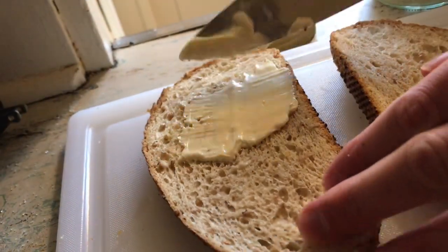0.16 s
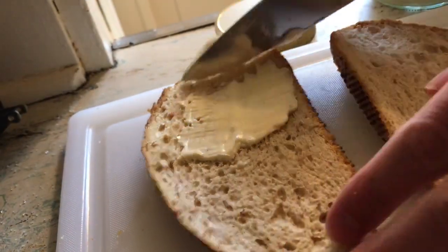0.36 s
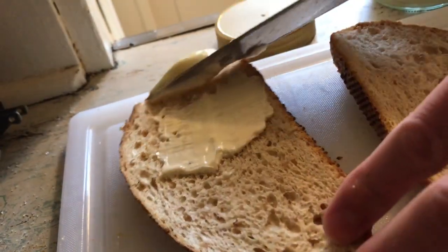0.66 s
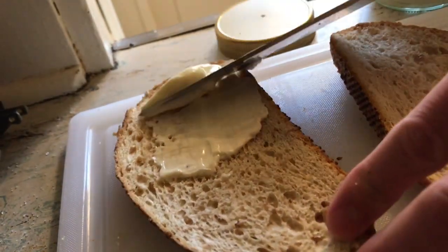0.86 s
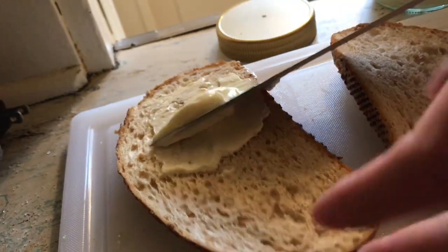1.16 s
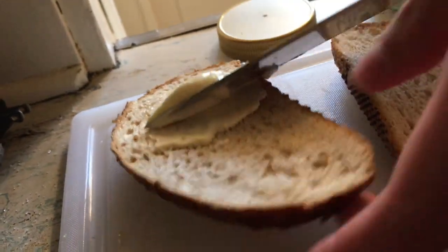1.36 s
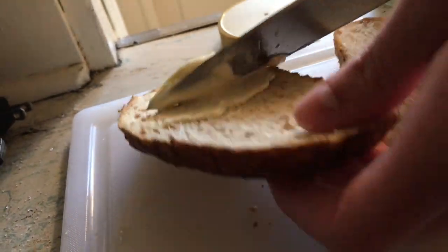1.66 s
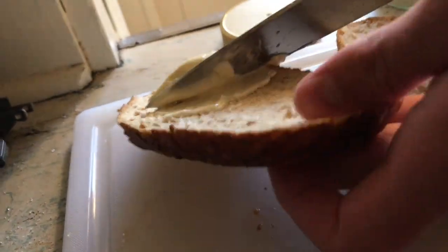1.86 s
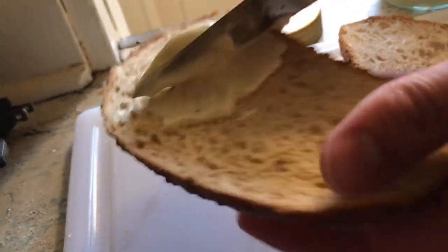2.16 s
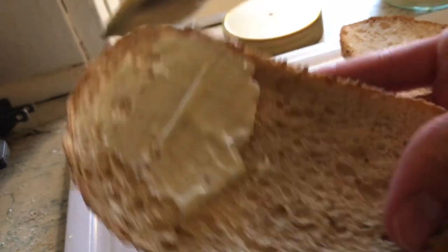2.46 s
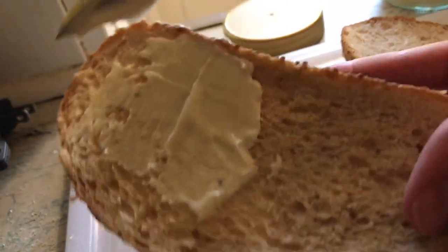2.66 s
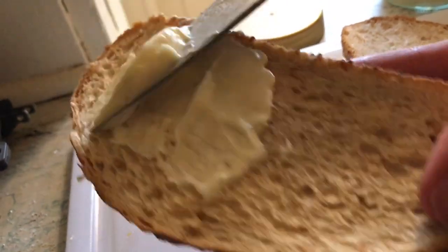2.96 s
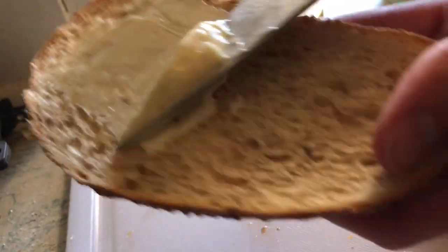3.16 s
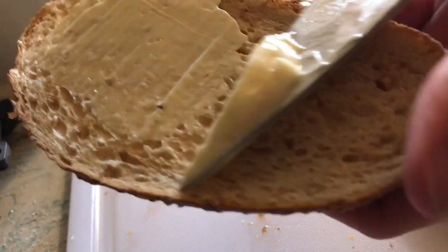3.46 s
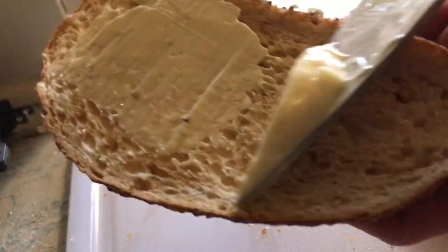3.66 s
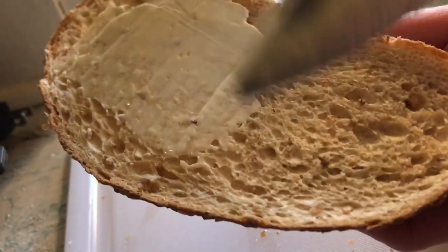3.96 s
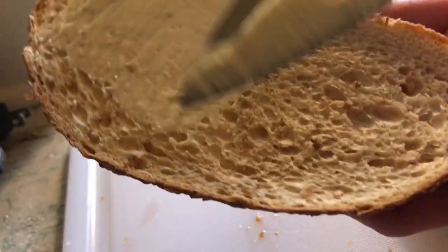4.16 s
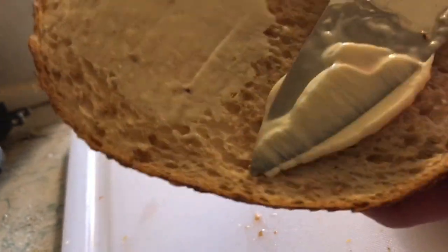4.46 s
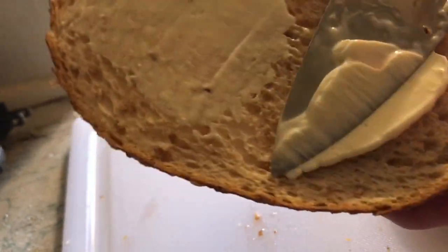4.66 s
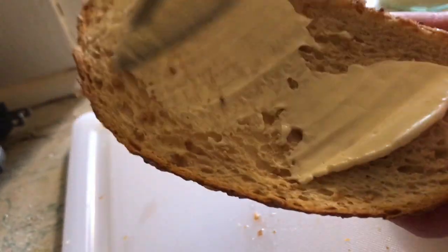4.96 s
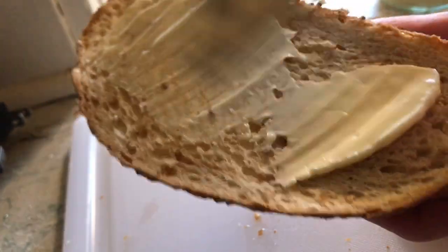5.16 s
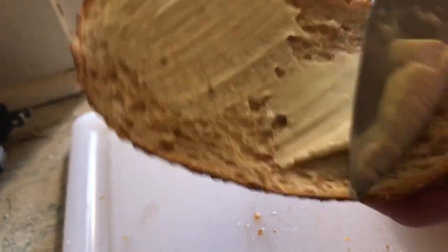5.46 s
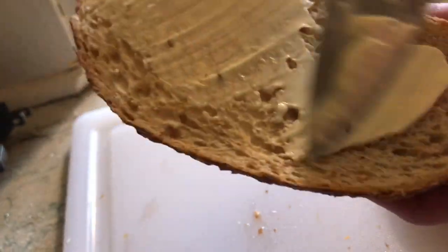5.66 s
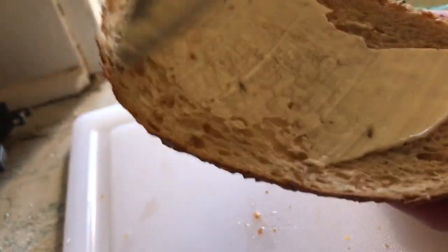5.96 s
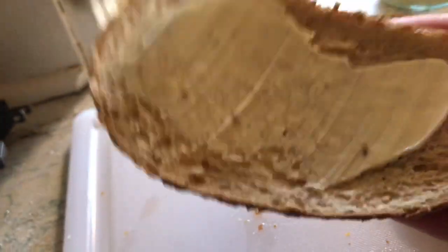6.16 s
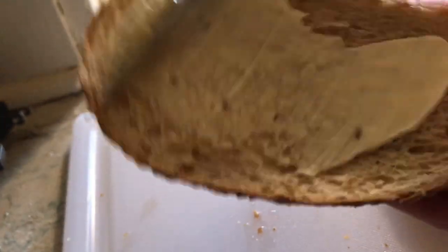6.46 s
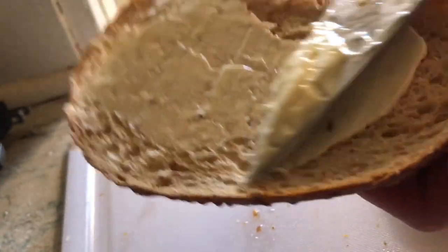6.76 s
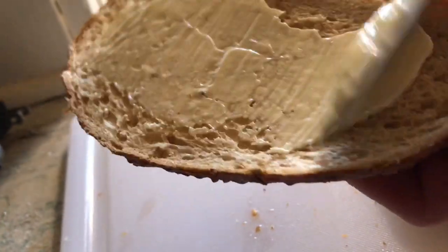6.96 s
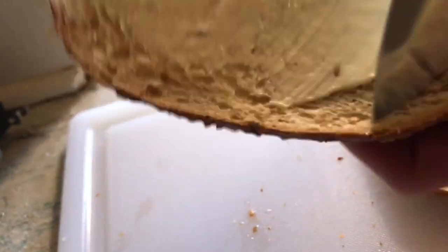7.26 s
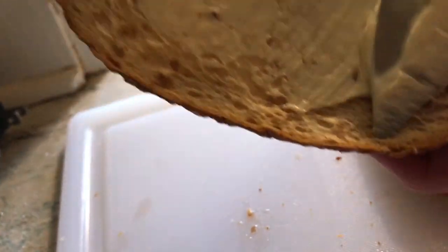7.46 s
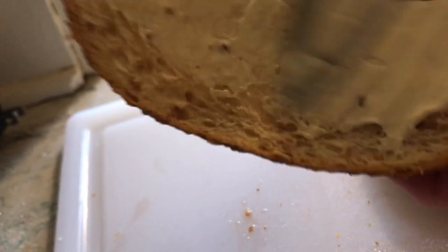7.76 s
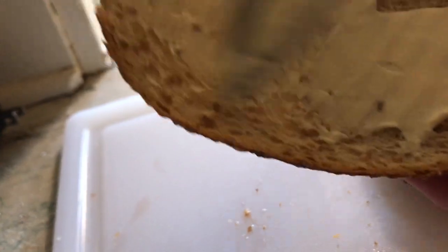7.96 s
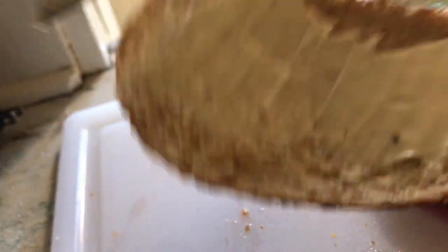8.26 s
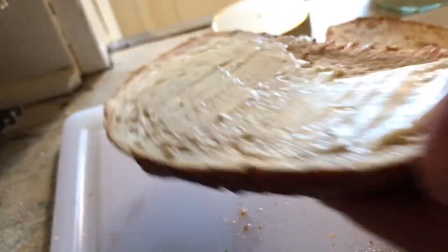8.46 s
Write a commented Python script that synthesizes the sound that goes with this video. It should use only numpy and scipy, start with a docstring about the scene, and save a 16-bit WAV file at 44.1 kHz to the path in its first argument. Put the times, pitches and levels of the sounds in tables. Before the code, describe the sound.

Very close to the microphone, a table knife scrapes butter over crisp toast. The strokes are short, dry and uneven, full of tiny crackles and sharper crust snaps. At first the slice also rubs and bumps softly on its board; after a pause the scraping grows brisker and brighter, with thin metallic rings as the blade slips off. A small, hard-walled kitchen adds a short tail over faint still air.

```python
"""A table knife spreads butter over a slice of toast, close to the microphone in a small quiet kitchen.
Each stroke crushes a swarm of tiny crust cells and snaps a few large ones; slice and crust colour the noise bursts.
The crackle shakes the damped blade, which rings more freely as it slips off the crust.
Beneath are soft thuds, the slice rubbing on its board in the first seconds, a short hard-walled room and still air."""
import sys
import numpy as np
from scipy import signal
from scipy.fft import rfft, irfft
from scipy.io import wavfile
from scipy.ndimage import uniform_filter1d

SR = 44100
rng = np.random.default_rng(int(sys.argv[2]) if len(sys.argv) > 2 else 0)


def persist_wave(psi):
    """Save psi, clipped to +-1, as 16-bit WAV."""
    counts = np.round(np.clip(psi, -1, 1) * 32767).astype(np.int16)
    wavfile.write(sys.argv[1], SR, np.atleast_2d(counts).T)


N = 379701


def amp(db):
    """Decibels to gain."""
    return 10 ** (np.asarray(db) / 20)


def unit(x):
    """Scales to rms 1."""
    return x / np.sqrt(np.mean(x ** 2) + 1e-20)


def read(points, hz):
    """Reads a table on a log-frequency axis."""
    f, value = np.transpose(points)
    return np.interp(np.log(hz + 1), np.log(f), value)


def add(mix, s, sound):
    """Mixes a sound in at time s."""
    part = mix[..., max(round(s * SR), 0):][..., :sound.shape[-1]]
    part += sound[..., :part.shape[-1]]


def noise(spectrum):
    """Steady noise of rms 1 with a given spectrum."""
    gain = amp(read(spectrum, np.fft.rfftfreq(N, 1 / SR)))
    return unit(irfft(rfft(rng.standard_normal(N)) * gain, N))


def drift(corner_hz):
    """A smooth random curve of rms 1, with little above the corner frequency."""
    hz = np.fft.rfftfreq(N, 1 / SR)
    return unit(irfft(rfft(rng.standard_normal(N)) / (1 + (hz / corner_hz) ** 4), N))


def causal(gain):
    """The sharpest (minimum-phase) impulse response that has this gain curve."""
    log_gain = np.log(np.maximum(np.r_[gain, gain[-2:0:-1]], 1e-5))
    return np.fft.ifft(np.exp(np.conj(signal.hilbert(log_gain)))).real[:len(gain)]


# still air of the kitchen: (frequency [Hz], relative density [dB per Hz])
AIR = [(20, -5), (45, -1.5), (65, 7), (130, -2.5), (250, -4.5), (500, -9.5), (1000, -14), (2000, -17.5),
       (4500, -19.5), (8000, -23), (10500, -22.5), (14000, -21), (15600, -28)]


def air(level_db=-66.5):
    """Steady coloured noise stands for the quiet kitchen behind everything."""
    return amp(level_db) * noise(AIR)


# how long the kitchen rings: (frequency [Hz], time to fall 60 dB [s])
KITCHEN_T60 = [(150, 0.35), (600, 0.35), (1500, 0.3653), (4000, 0.49), (8000, 0.37), (15000, 0.25)]
# colour of the kitchen's tail: (frequency [Hz], relative level [dB])
KITCHEN_COLOUR = [(100, 11), (700, 4.5), (3000, -0.5), (7000, -2.5), (15000, 4)]


def kitchen(x, early_db=-17, tail_db=-15):
    """Board and worktop reflect within 20 ms; then a short tail comes from the hard walls."""
    early = np.zeros(SR // 50)
    at = rng.integers(SR // 500, len(early), size=10)
    early[at] = rng.choice([-1, 1], size=10) / np.sqrt(10)
    # sparse random echoes; each band of frequencies then dies away at its own pace
    taps = rng.standard_normal(SR) * (rng.random(SR) < .1) * (np.arange(SR) > SR // 150)
    hz, t, z = signal.stft(taps, SR, nperseg=256)
    decay_db = 60 * t / read(KITCHEN_T60, hz)[:, None]
    z = z * amp(read(KITCHEN_COLOUR, hz)[:, None] - decay_db)
    tail = signal.istft(z, SR, nperseg=256)[1]
    tail /= np.linalg.norm(tail)
    reflections = amp(early_db) * signal.oaconvolve(x, early)[:N]
    return reflections + amp(tail_db) * signal.oaconvolve(x, tail)[:N]


def push(rise_s, length_s, sag_db, bite_s=0.0025, bite_db=-15, let_go_s=0.005):
    """The gain of one push of the hand: it bites in low, builds up, sags and lets go quickly."""
    t = np.arange(SR) / SR
    sag = np.clip((t - rise_s) / max(length_s - rise_s, bite_s), 0, 1)
    db = bite_db * np.maximum(1 - t / rise_s, 0) - sag_db * sag
    let_go = np.exp(-np.maximum(t - length_s, 0) / let_go_s)
    return amp(db) * (1 - np.exp(-t / bite_s)) * let_go


# rumble of the board: (frequency [Hz], relative density [dB per Hz])
BOARD = [(20, -26.5), (55, -4), (100, -0.5), (170, -0.5), (300, -15), (700, -19), (2000, -54)]
# the slice is shoved over the board:
# (time [s], rise [s], length [s], level before bite, sag and jerks [dB], sag by the end [dB])
SHOVES = [(0.0, 0.037, 0.11, -53.5, -5.5), (0.385, 0.031, 0.52, -61, -6.5), (0.954, 0.073, .2, -42, 7),
          (1.473, 0.14, 0.78, -58.5, 14.5)]


def shuffle(lumpy_db=4):
    """The slice rubs on the board in small jerks: board rumble under an uneven force."""
    force = np.zeros(N)
    for s, rise_s, length_s, db, sag_db in SHOVES:
        add(force, s, amp(db) * push(rise_s, length_s, sag_db))
    return noise(BOARD) * force * amp(lumpy_db * drift(30))


# soft blows of knife and fingers on the slice: (time [s], level of the swing [dB], pitch [Hz])
THUDS = [(0.386, -33.5, 91), (1.015, -34, 140.9), (1.06, -37.5, 150), (1.565, -49, 133), (1.66, -47, 293),
         (1.70, -39, 87.7), (2.846, -47, 65.9), (3.647, -46, 194.7), (5.411, -47.5, 76.4),
         (6.473, -38, 65.7), (7.279, -44.5, 109), (8.03, -36.5, 92.8)]


def thuds(rise_s=0.00069, fade_s=0.019, puff=0.43):
    """The soft slice takes a blow and swings, quickly damped, with a dull puff."""
    out, t, rumble = np.zeros(N), np.arange(SR // 5) / SR, noise(BOARD)
    shape = (1 - np.exp(-t / rise_s)) * np.exp(-t / fade_s)
    shape /= shape.max()
    for k, (s, db, hz) in enumerate(THUDS):
        swing = np.sin(2 * np.pi * hz * t) + puff * rumble[k * len(t):][:len(t)]
        add(out, s, amp(db) * swing * shape)
    return out


# modes of the free blade: (frequency [Hz], relative level [dB], time to fall 60 dB [s])
FREE_BLADE = [(2160, -6.5, 0.36), (2736, -14, 0.22), (3620, 1, 0.14), (4600, -13, .28), (5020, -6, 0.36),
              (5070, -10, 0.29), (6000, 0, .23), (7150, -2.5, 0.24), (14400, -10, .18)]
# the blade slips off the crust and rings freely:
# (time [s], level added to the modes [dB], pitch favoured among the modes [Hz])
RELEASES = [(0.085, -70, 5900), (3.483, -47.5, 4960), (3.815, -42, 4900), (4.894, -41, 5100),
            (6.053, -39.5, 6900), (7.011, -34, 3650), (8.063, -25, 6300), (8.11, -35, 3600),
            (8.146, -39.5, 6800)]


def free_blade(crackle, fed_db=-18, focus_db_per_octave=30, twin_hz=24, twin_db=-5):
    """The part of the blade clear of the bread rings on: fed by the crackle, and struck at each release."""
    t, modes = np.arange(SR // 2) / SR, []
    for hz, db, t60 in FREE_BLADE:
        # the blade is a little lopsided, so every mode has a weaker twin that beats against it
        twin = amp(twin_db) * np.sin(2 * np.pi * (hz + twin_hz) * t)
        modes.append(amp(db - 60 * t / t60) * (np.sin(2 * np.pi * hz * t) + twin))
    modes = np.array(modes)
    ring = modes.sum(0)
    out = amp(fed_db) * signal.oaconvolve(crackle, ring / np.linalg.norm(ring))[:N]
    for s, db, hz in RELEASES:
        octaves = abs(np.log2(np.transpose(FREE_BLADE)[0] / hz))
        add(out, s, amp(db - focus_db_per_octave * np.minimum(octaves, .5)) @ modes)
    return out


# blade resonances, damped by butter and bread: (frequency [Hz], width [Hz], relative level [dB])
PRESSED_BLADE = [(2797, 110, 5), (3670, 120, 4), (5220, 77, 11), (5980, 190, 8), (6954, 260, 4),
                 (7600, 100, -3.5), (8380, 91, 3.5), (9130, 290, 7), (12480, 250, -0.5), (13200, 220, -7),
                 (14440, 320, 8.5)]


def pressed_blade(crackle, node_db=3.0, wander_db=4.0, bend=0.0049, level_db=-3):
    """The crackle shakes damped modes; their strength varies with the contact point, their pitch drifts."""
    out, (s, *_, cm) = np.zeros(N), np.transpose(STROKES)
    contact_cm = cm[np.maximum(np.searchsorted(s, np.arange(N) / SR) - 1, 0)]
    for hz, width, db in PRESSED_BLADE:
        # bending waves in thin steel shorten with the root of the frequency
        wavelength_cm = 302 / np.sqrt(hz)
        coupling_db = node_db * np.cos(4 * np.pi * contact_cm / wavelength_cm) + wander_db * drift(7.0)
        fed = crackle * amp(level_db + db + coupling_db)
        # shift the drifting mode down to 0 Hz, smooth it to the mode's width, and shift it back
        turn = np.exp(2j * np.pi * np.cumsum(hz * (1 + bend * drift(4.0))) / SR)
        r = np.exp(-np.pi * width / SR)
        out += 2 * (turn * signal.lfilter([1 - r], [1, -r], fed / turn)).real
    return out


EDGE_HZ = 15800  # the recorder's upper band limit
# spectrum of one crumb breaking: (frequency [Hz], relative density [dB per Hz])
CRUMB = [(25, -43.5), (55, -7), (140, -8.5), (330, -8), (600, -7.5), (1200, -3), (2200, -6.5), (3000, -3),
         (5000, -4.5), (7000, -3.5), (10300, -7.5), (12500, 0.5), (14300, -4.5), (15600, -7.5)]


def toast(parts, bass_hz=600, hollow_hz=1550, crisp_hz=8000, bass_share=0.27, level_db=-3.0):
    """The slice radiates a hollow band of each break, the dry crust the middle and top."""
    hz = np.fft.rfftfreq(4096, 1 / SR)
    low = 1 / (1 + (hz / hollow_hz) ** 4)
    high = 1 / (1 + (crisp_hz / (hz + 1)) ** 6)
    low = low * (1 - (1 - bass_share) / (1 + (hz / bass_hz) ** 4))
    colour = amp(read(CRUMB, hz))
    colour /= np.sqrt(np.mean(colour ** 2 * (hz < EDGE_HZ)))
    bins, breaks = np.fft.rfftfreq(N, 1 / SR), np.zeros(N)
    for part, share in zip(parts, (low, 1 - low - high, high)):
        breaks += irfft(rfft(part) * np.interp(bins, hz, share), N)
    return amp(level_db) * signal.oaconvolve(breaks, causal(colour))[:N]


def loose_crumbs(per_s=15, level_db=-59, hollow_db=3, crisp_db=-7, until_s=2.2):
    """Crumbs tick faintly under the slice while the fingers move it about; rows like CRACKS."""
    at = np.flatnonzero((rng.random(N) < per_s / SR) & (np.arange(N) < until_s * SR))
    sizes = rng.standard_normal(N)[at]
    return [(i / SR, level_db + 2 * size, hollow_db, crisp_db) for i, size in zip(at, sizes)]


def small_cracks(force, per_s=42, over_db=-2, least_db=-45, spread_db=4,
                 hollow_db=-6, crisp_db=1, colour_db=6):
    """Lesser snaps come by chance under a firm blade, their level following its push; rows like CRACKS."""
    at = np.flatnonzero((rng.random(N) < per_s / SR) & (force > amp(least_db)))
    size, hollow, crisp = rng.uniform(-0.87, 1, (N, 3))[at].T
    db = 20 * np.log10(force[at]) + over_db + spread_db * size
    return list(zip(at / SR, db, hollow_db + colour_db * hollow, crisp_db + colour_db * crisp))


# the snaps of crust that stand out:
# (time [s], relative level [dB], hollowness = how much the slice sounds [dB], crispness = extra top [dB])
CRACKS = [(0.044, -28, 3, -4), (0.385, -23, -4.5, -10), (0.432, -26, -14, -14), (0.661, -43, -1.5, 1.5),
          (0.682, -37, 8.5, -1.5), (0.704, -35.5, -3, -1.5), (0.76, -31, 2, 0.5), (0.777, -30, -3, -3),
          (0.822, -22.5, 5, -14), (0.983, -22.5, -2, -1.5), (1.139, -29.5, -2, -4), (1.164, -31.5, 0, -2),
          (1.394, -27.5, -4.5, -3), (1.422, -30, 2, -8), (1.528, -39, 7, -7), (1.565, -33, 1, -8),
          (1.63, -33, -17, -3.5), (1.666, -41, 11, -4), (1.705, -34.5, 5.5, -8.5), (1.8, -41.5, 2, -7),
          (1.828, -43, 9, -14), (1.919, -41, -9, -0.5), (1.953, -34, -20, -2), (2.072, -38, 3, -5.5),
          (2.844, -41, 7.5, -12.5), (2.932, -30, -26, -1), (2.972, -34, 2.5, -7.5), (3.023, -27, -7, -4.5),
          (3.084, -28.5, -6, 7.5), (3.273, -31, 9, 8.5), (3.281, -26, -10.5, 4.5),
          (3.334, -33.5, -10.5, 4.5), (3.446, -21, -21.5, 3.5), (4.357, -42.5, 2, -5),
          (4.402, -39.5, -11.5, -7), (4.475, -32.5, 0, -8), (4.53, -44, -0.5, -4), (4.546, -44, 8.5, -2.5),
          (4.752, -24.5, 3, 3.5), (4.778, -20, 5, 0.5), (4.795, -21.5, -6, 0), (4.894, -25.5, 4.5, 1),
          (4.966, -32.5, -7.5, -9), (5.41, -26, -1, -3), (5.59, -20, -11, 1), (5.68, -19, -7, 1.5),
          (5.875, -29, 14, 1.5), (5.991, -26.5, 11, 4.5), (6.473, -24.5, 4.5, 6), (6.49, -27.5, -1, -3),
          (6.673, -24, -8, 6), (6.707, -17, -12, -3.5), (6.769, -34, -12, 1), (6.826, -20.5, -6.5, -9),
          (6.881, -21.5, -6, -5.5), (6.91, -29, 6, -1), (6.942, -28.5, -6, -3.5), (7.012, -28.5, -13, 2),
          (7.278, -33, 13, -6.5), (7.33, -32.5, -6, -7), (7.337, -37, 7, 10), (7.353, -32.5, 4, -21),
          (7.418, -27, -1, -8.5), (7.485, -25, -7, -14), (7.505, -22.5, -25, -2.5), (7.626, -44, -9, 5.5),
          (7.745, -19, -17, -3), (7.827, -25, -10, 6), (8.016, -21, 5, 5), (8.063, -18.5, -17, -1.5),
          (8.089, -16.5, -9, 0.5), (8.279, -50, -8, 5.5), (8.372, -52.5, -2, -5), (8.581, -48.5, -5, -12)]


def cracks(rows, rise_s=0.00047, fade_s=0.0027, onset_s=.0014, onset_db=-20, splinter_db=4.5,
           level_db=0, knock_hz=3600, knock_q=2.5, knock_per_db=0.07):
    """A large cell snaps in a quick run of splinters, with a softened onset; hollow, middle, crisp parts."""
    out, t = np.zeros((3, N)), np.arange(-SR // 125, SR // 50) / SR
    after = np.maximum(t, 0)
    snap = (1 - np.exp(-after / rise_s)) * np.exp(-after / fade_s)
    shape = snap + amp(onset_db) * np.exp(-abs(t) / onset_s)
    knock = signal.iirpeak(knock_hz, knock_q, fs=SR)
    draws = rng.standard_normal(size=(400, 2, len(t)))
    for (s, db, hollow_db, crisp_db), (run, hiss) in zip(rows, draws):
        splinters = unit(uniform_filter1d(run, size=20))
        burst = hiss * amp(splinter_db * splinters) * shape
        # the duller the snap, the thicker the piece of crust, and the more it knocks with a pitch
        burst = burst + knock_per_db * max(-crisp_db, 0) * signal.lfilter(*knock, burst)
        # same energy as 4 ms of noise at rms 1
        burst *= np.sqrt(.004 * SR / np.sum(burst ** 2))
        add(out, s + t[0], amp(level_db + db + np.array([[hollow_db], [0], [crisp_db]])) * burst)
    return out


def crumb_colour(ripple_db, lowest_hz=1800, order=4):
    """Size and shape give a crumb its own few resonances, weaker in the bass; energy 1."""
    hz = np.fft.rfftfreq(256, 1 / SR)
    bumps = unit(signal.convolve(rng.standard_normal(len(hz)), np.hanning(order + 2), "same"))
    response = causal(amp(ripple_db * bumps * np.minimum(hz / lowest_hz, 1)))
    return response / np.linalg.norm(response)


def scrape(drive, cells_per_s=520, spread_db=2.0, fade_s=0.0014, smear=0.055, level_db=-1.5,
           flicker_db=2.36, catches_per_s=110, ripple_db=3.5, judder_db=2, judders_per_s=70, count=12):
    """Crust cells give way under the edge, each a tiny puff; returns hollow, middle and crisp parts."""
    sizes = amp(spread_db * np.minimum(rng.exponential(1, N), 4)) ** 2
    cells = sizes * (rng.random(N) < cells_per_s / SR)
    power = signal.lfilter([1], [1, -np.exp(-1 / (fade_s * SR))], cells)
    # the hand sets the work done; chance only shares it out among the cells, and butter smears a little
    power = power / (uniform_filter1d(power, size=700) + 1e-6) + smear
    puffs = np.sqrt(np.abs(power)) * rng.standard_normal(N)
    # the edge catches one crumb after another; each lends one of a few colours for a moment
    catch = np.cumsum(rng.random(N) < catches_per_s / SR)
    crumb = rng.permutation(N)[catch] % count
    puffs = sum(signal.oaconvolve(puffs * (crumb == k), crumb_colour(ripple_db))[:N] for k in range(count))
    # the blade judders over the ridges and holes of the crust
    puffs = puffs * amp(level_db + judder_db * drift(judders_per_s))
    # the balance of the three parts flickers too
    return np.array([puffs * part * amp(flicker_db * drift(70)) for part in drive])


# strokes of the blade: (time [s], rise [s], length [s], drive before bite and sag [dB], sag by the end [dB],
# hollowness at the start [dB], hollowness at the end [dB], crispness [dB], contact from the handle [cm])
STROKES = [(0.0, 0.004, .06, -41.5, 0.5, 21, 7.5, -3, 13),
           (0.064, 0.0095, 0.029, -31, 6.5, 10.5, 4, -10, 13),
           (0.786, 0.007, 0.076, -26, 6, -4, 2.5, -6.5, 13),
           (0.962, 0.034, .156, -26.5, 3, 3.5, 4, -6, 11.5),
           (1.391, 0.0033, 0.038, -39, 1.5, 4, 2, -7, 11.5), (1.52, 0.042, 0.29, -52.5, 3, 5, 3, -14, 11.5),
           (1.898, 0.15, 0.053, -60.5, -8, 6, 7, -16, 11.5),
           (2.129, 0.035, 0.055, -47.5, 4, 2.5, 7, -8, 11.5),
           (2.2, 0.053, .135, -47, 5, 12.5, 2.5, -9, 12.5), (2.465, 0.006, .12, -61, 2, -10, -8, 5, 11.5),
           (2.901, 0.035, .04, -37.5, 7, 15, -3, -10, 15.3),
           (2.994, 0.0076, 0.095, -39, 12, 7, 12, -4, 15.3),
           (3.062, 0.043, .17, -27.5, 2.5, 6, 0.5, -4.5, 15.3),
           (3.236, 0.069, 0.067, -32, -2, -2, -2.5, -6, 11.5),
           (3.343, 0.046, 0.15, -27, 7.5, 7.5, -7, -2, 11.5),
           (3.612, .04, 0.055, -31, 0.5, -3, -11, -2, 9.9),
           (3.678, 0.028, 0.15, -29, 6.5, -10, -1, -7, 9.9),
           (4.384, 0.0088, .045, -46, 2, 12, 2, -8.5, 11.2),
           (4.742, 0.03, .108, -27, 7.5, 2.5, 6.5, -3, 11.2),
           (4.853, 0.0093, .158, -42.5, 3.5, 14, 15, -18, 11.2),
           (5.408, 0.032, 0.072, -27, 3, -2.5, 4, -3.5, 12.6),
           (5.534, 0.047, 0.088, -25, 2.5, -4, 0, -3, 13.2), (5.64, 0.049, 0.22, -25.5, 9, 2, 10, -4, 13.2),
           (5.873, .008, 0.063, -33.5, -4.5, 15.5, 10, -2, 12.66),
           (5.935, 0.032, 0.12, -26.5, 2.5, 16, -1, -3.5, 12.66),
           (6.47, .003, 0.043, -38.5, 8, 14, -7, -12, 10.2),
           (6.516, .02, .07, -35.5, -4.5, 4.5, 6.5, -10.5, 10.2),
           (6.58, 0.018, 0.1466, -25.5, 10, 7, -0.5, -2, 10.2),
           (6.731, .005, 0.078, -43, 4, -7, 5.5, -2.5, 10.2),
           (6.816, 0.009, 0.017, -27.5, 7, 11, 12, -1, 11.2), (6.84, 0.005, 0.05, -23, 6, 1, -8, -10, 12.4),
           (6.89, 0.011, .065, -38, -0.5, -5, 5.5, -16, 12.4),
           (6.993, 0.017, 0.058, -34, 5, 3.5, 6.5, -4, 12.4),
           (7.275, 0.0027, 0.064, -44, 3, 7, 10, -5, 11.6),
           (7.485, 0.032, 0.041, -34.5, 5, -1, -6, -17, 11.6), (7.734, 0.03, 0.14, -24, 20, 4, 3, -1, 11.6),
           (7.964, 0.037, 0.078, -23.5, 8, 4.5, 10.5, -4.5, 12.4),
           (8.034, .012, 0.12, -24.5, 6.5, 2.5, -0.5, -1, 12.4),
           (8.444, 0.025, 0.087, -54.5, -0.5, -6, -6, -3, 12.4)]


def drag():
    """How hard the strokes drive hollow, middle and crisp parts; hollowness shifts as the blade travels."""
    out, t = np.zeros((3, N)), np.arange(SR) / SR
    for s, rise_s, length_s, db, sag_db, hollow_from_db, hollow_to_db, crisp_db, _ in STROKES:
        force = amp(db) * push(rise_s, length_s, sag_db)
        hollow_db = np.interp(t, [0, length_s], [hollow_from_db, hollow_to_db])
        add(out, s, np.array([force * amp(hollow_db), force, force * amp(crisp_db)]))
    return out


def scene(firm_db=-48):
    """Crackle, blade and handling near the microphone, with the kitchen and its air around them."""
    drive = drag()
    force = drive[1]
    snaps = cracks(CRACKS + small_cracks(force) + loose_crumbs())
    crackle = toast(scrape(drive) + snaps)
    # a light touch shakes the blade less; a firm drag couples it to the crust
    grip = 0.33 + 0.58 * force / (force + amp(firm_db))
    blade = pressed_blade(grip * crackle) + free_blade(grip * crackle)
    near = crackle + blade + thuds() + shuffle()
    return (near + kitchen(near) + air())[None]


def record(dry):
    """The recorder's band limit: a steep low-pass at EDGE_HZ."""
    low_pass = signal.firwin(511, EDGE_HZ, window=("kaiser", 7), fs=SR)
    return signal.oaconvolve(dry, low_pass[None], "same")


dry = scene()
out = record(dry)
persist_wave(out)
```